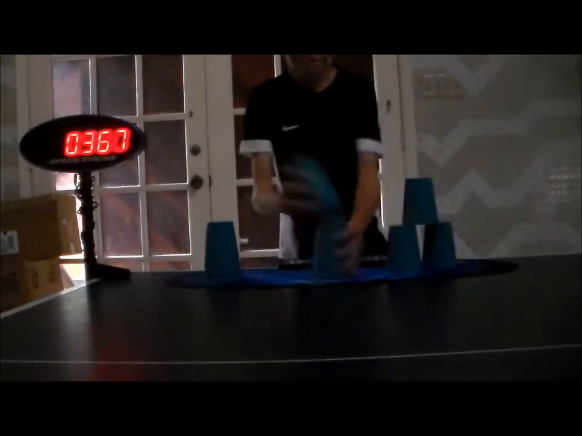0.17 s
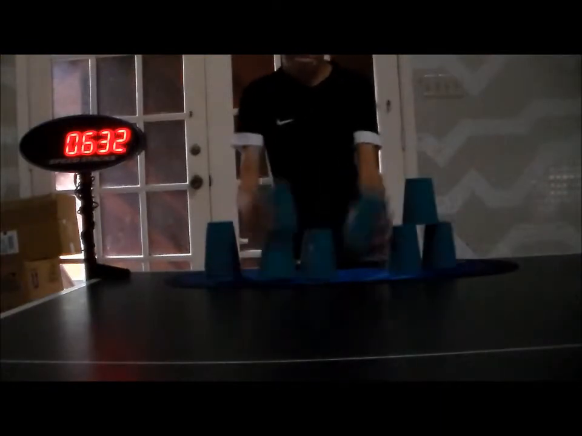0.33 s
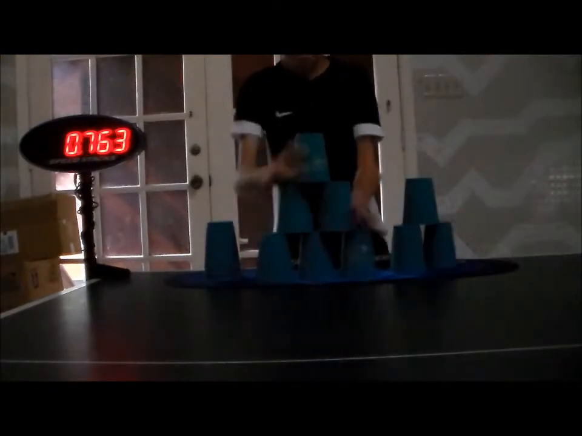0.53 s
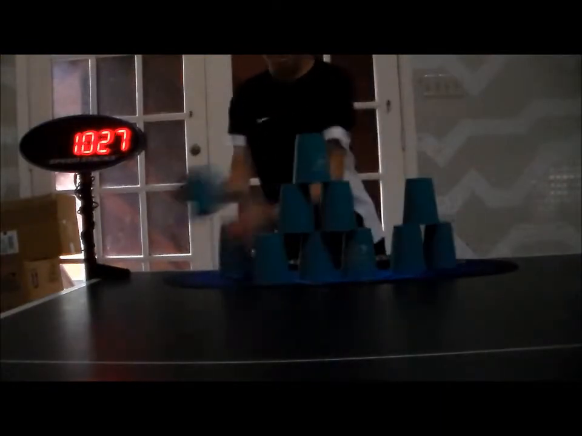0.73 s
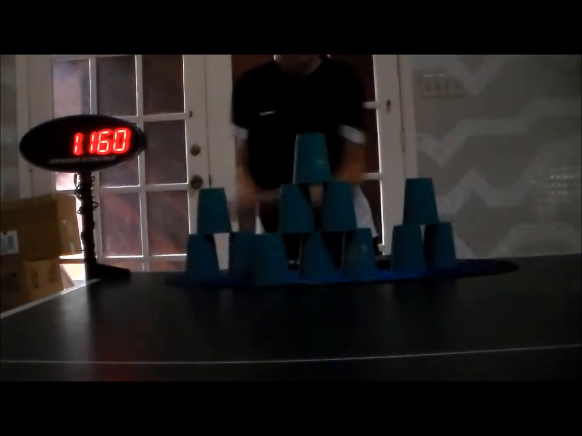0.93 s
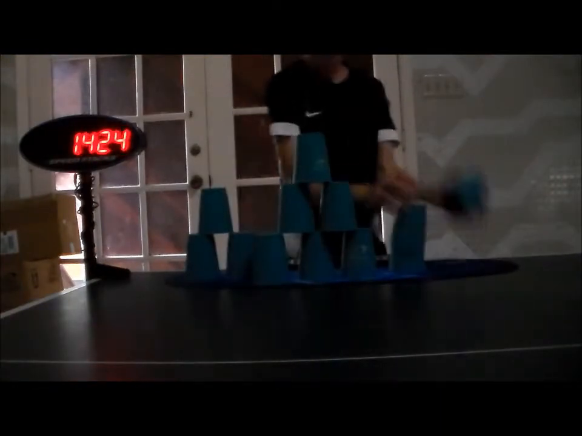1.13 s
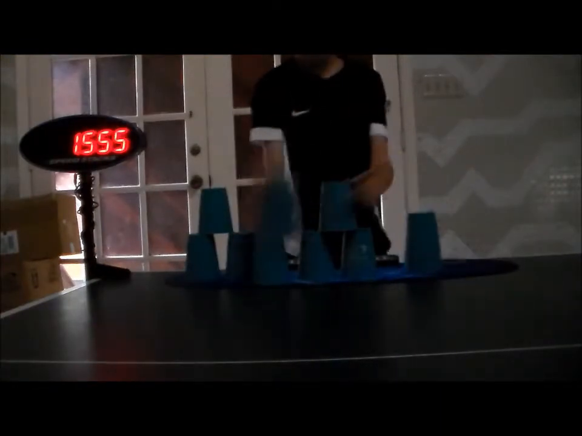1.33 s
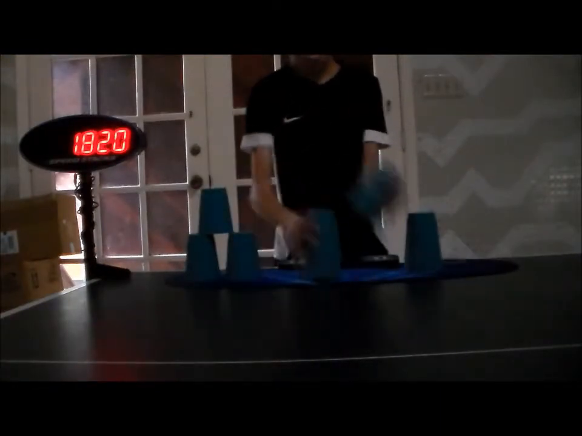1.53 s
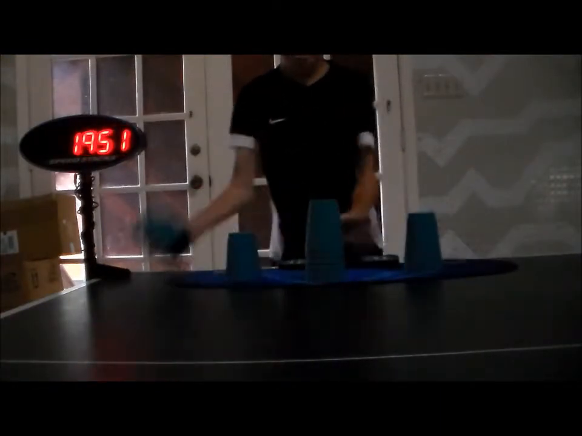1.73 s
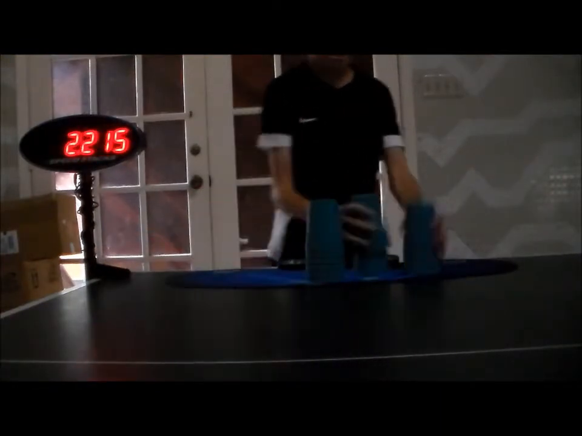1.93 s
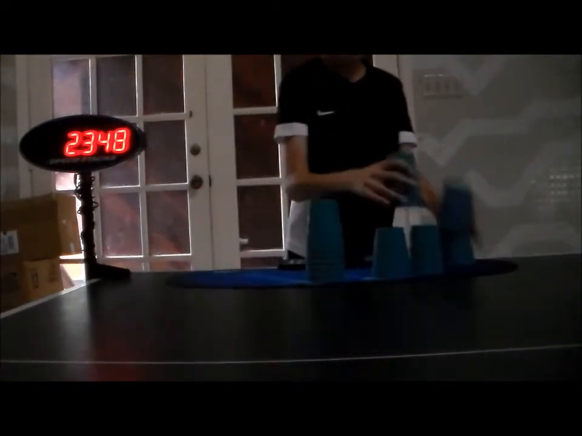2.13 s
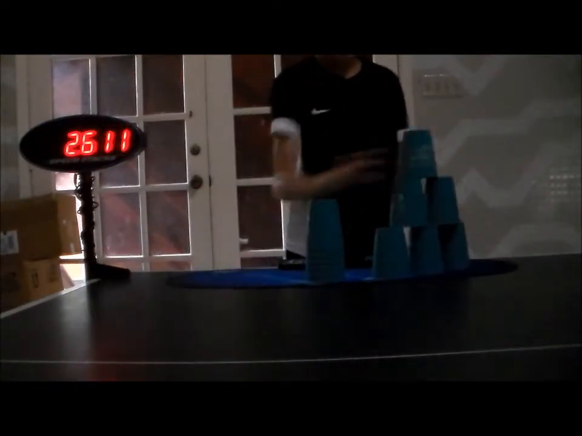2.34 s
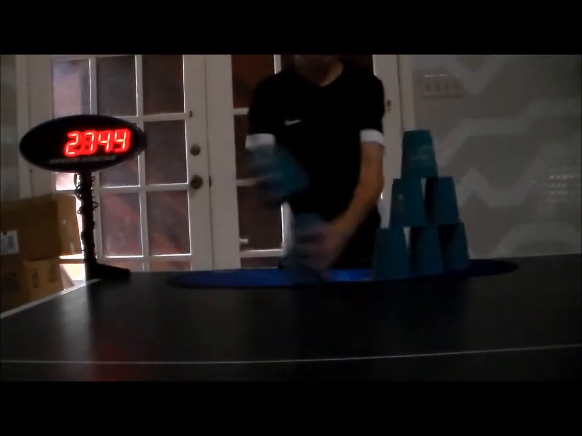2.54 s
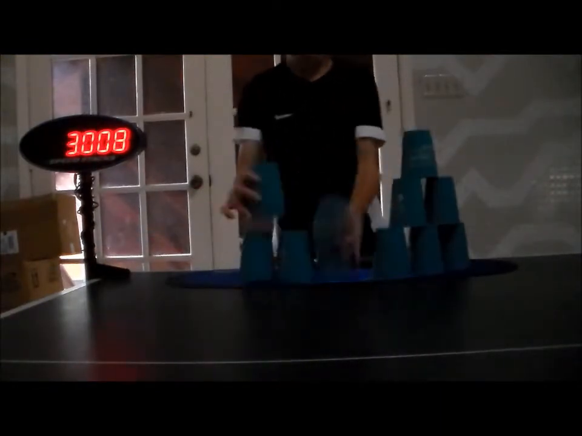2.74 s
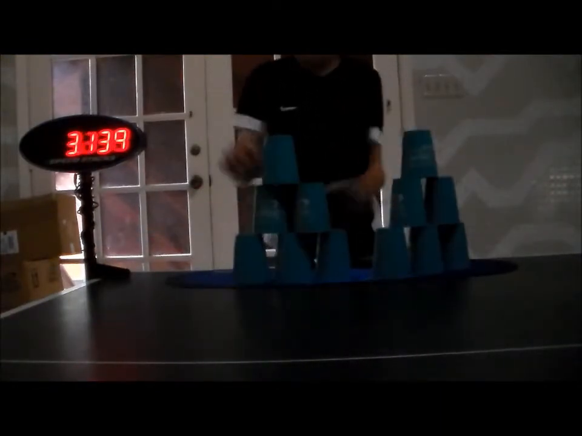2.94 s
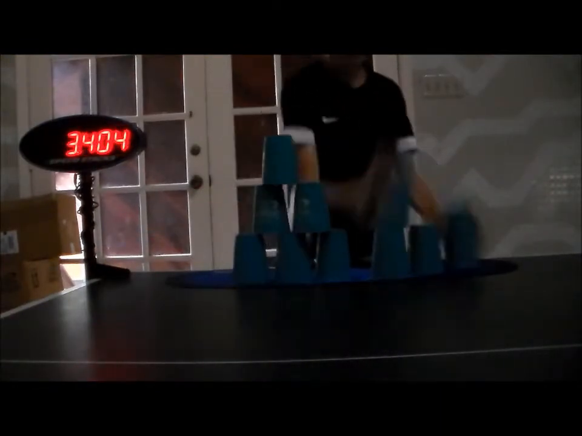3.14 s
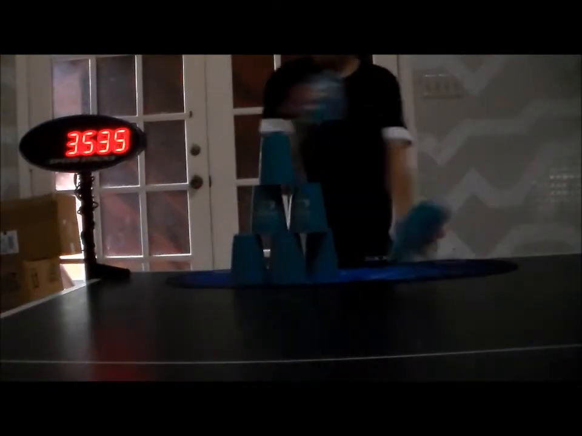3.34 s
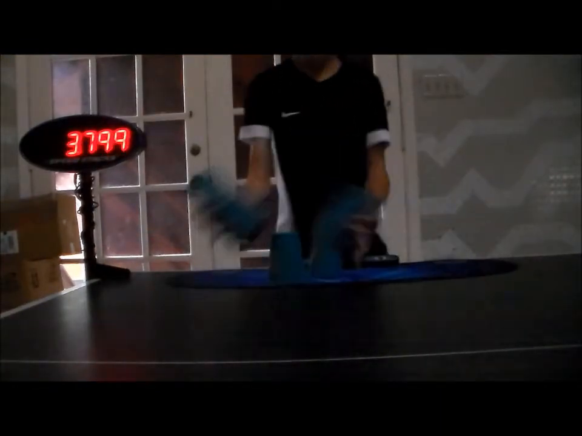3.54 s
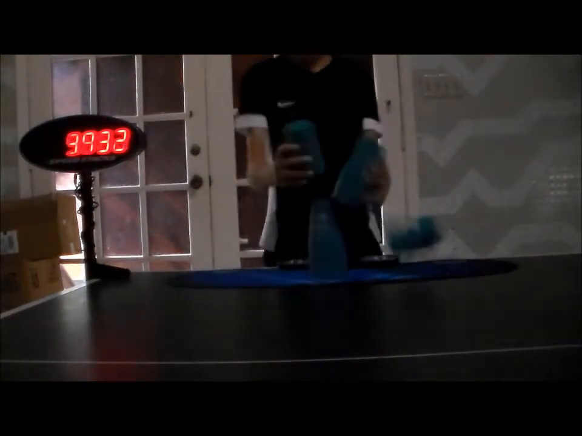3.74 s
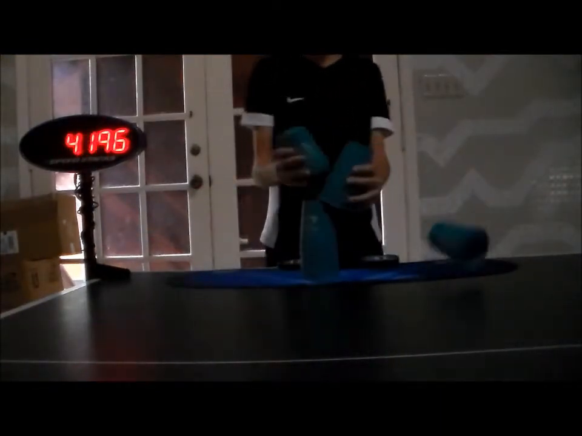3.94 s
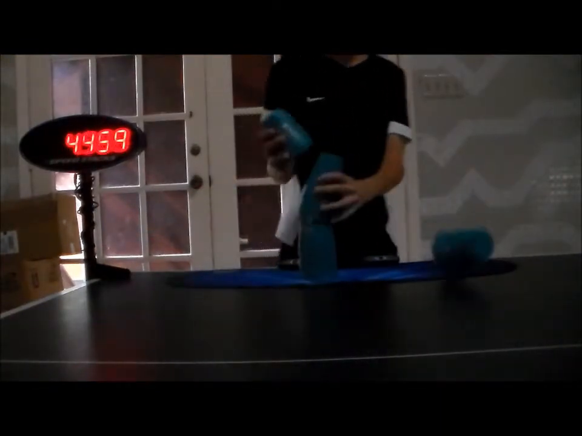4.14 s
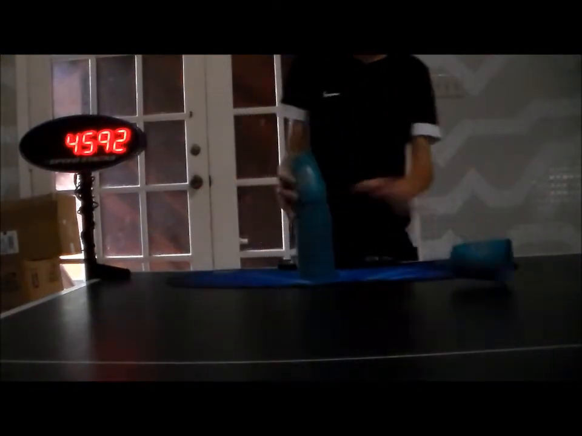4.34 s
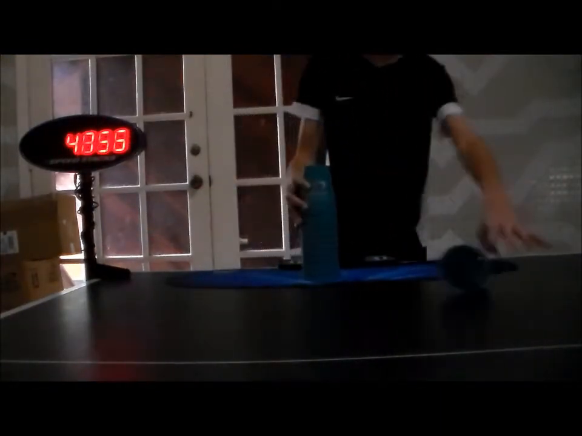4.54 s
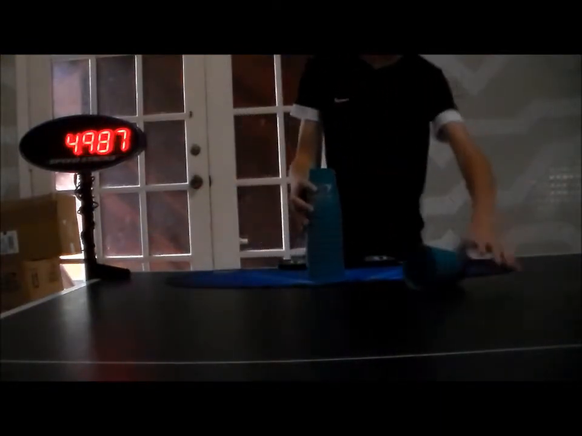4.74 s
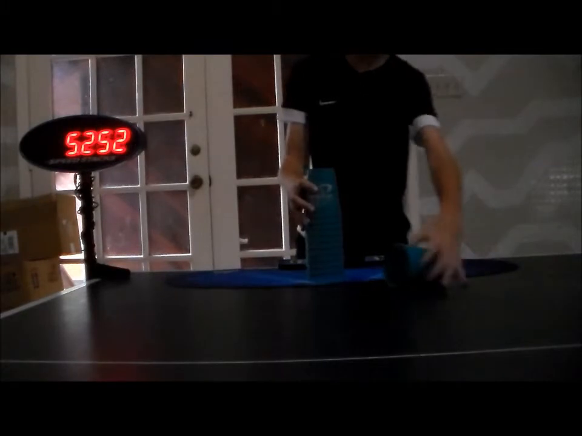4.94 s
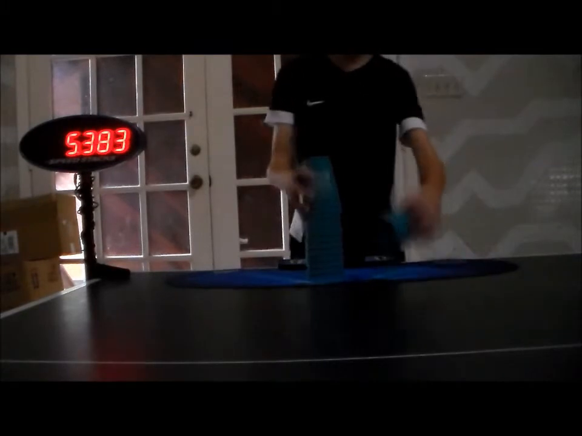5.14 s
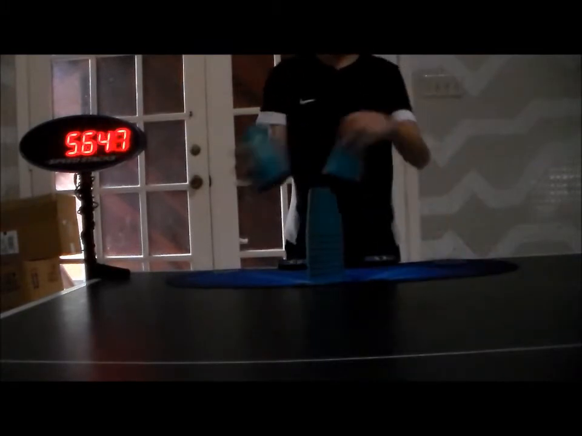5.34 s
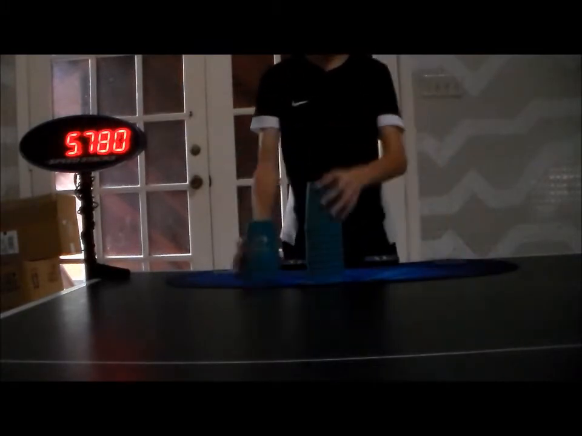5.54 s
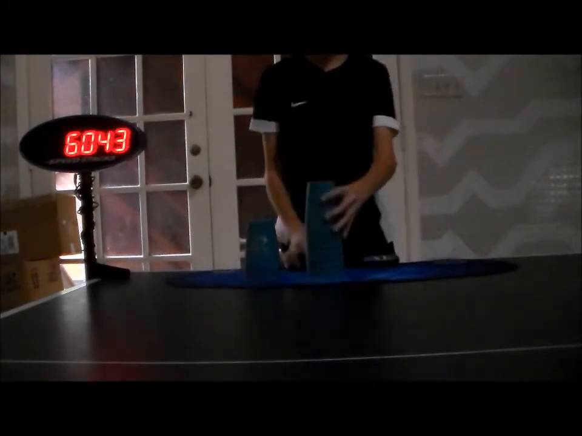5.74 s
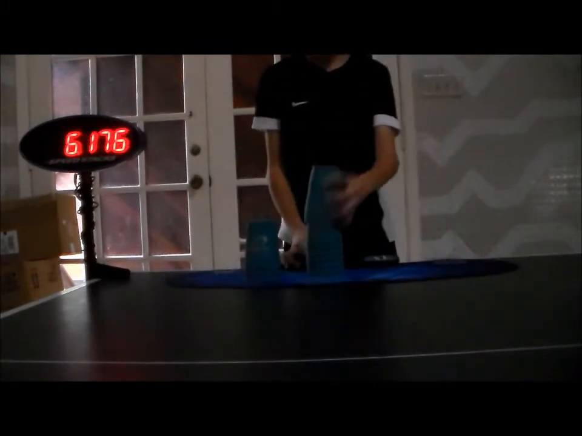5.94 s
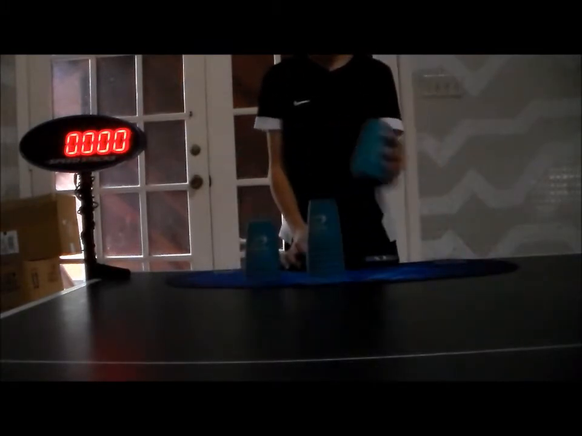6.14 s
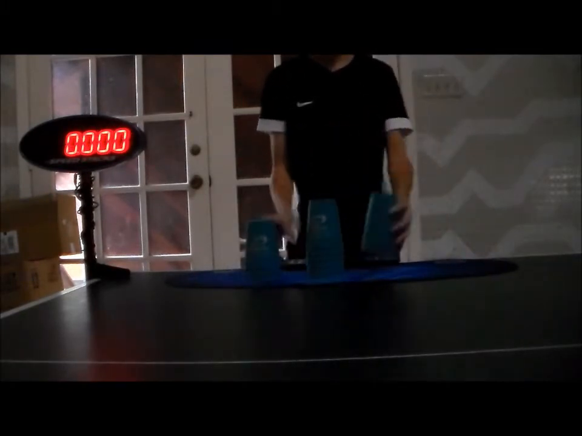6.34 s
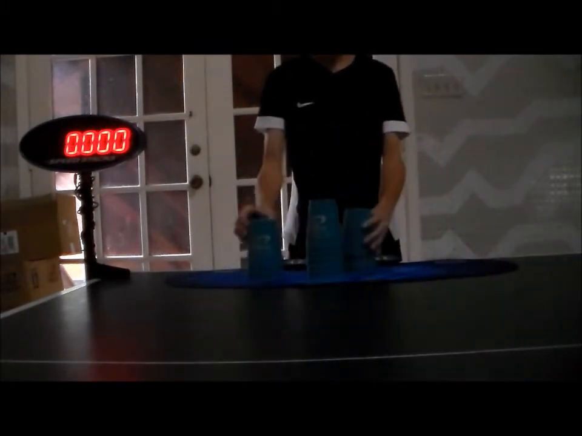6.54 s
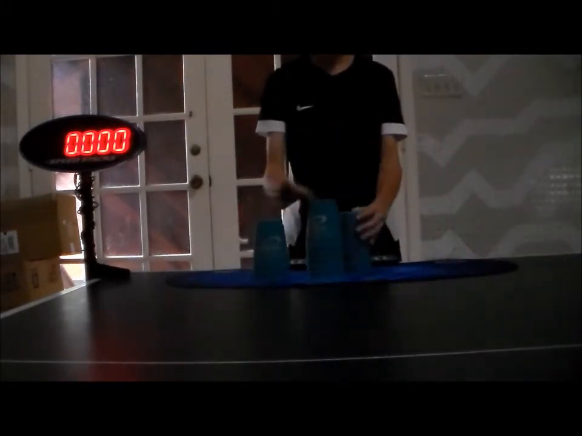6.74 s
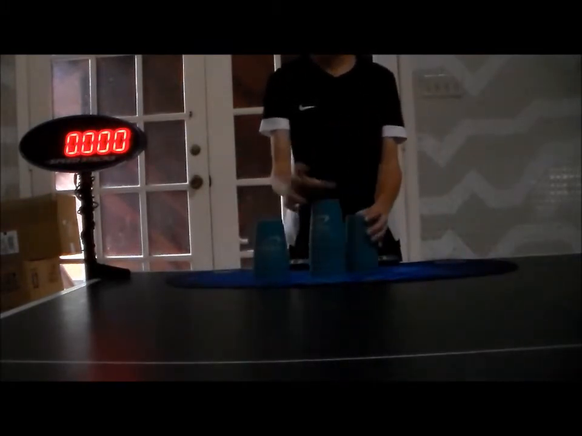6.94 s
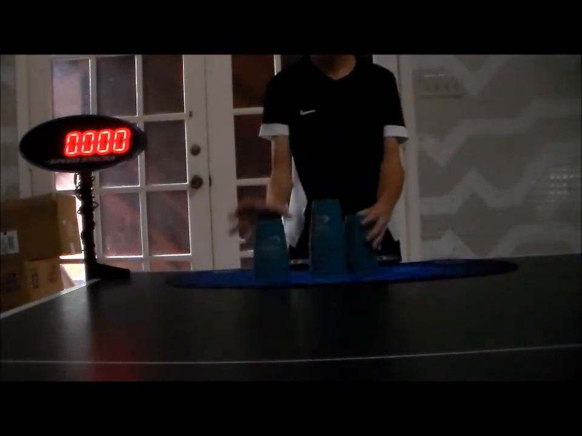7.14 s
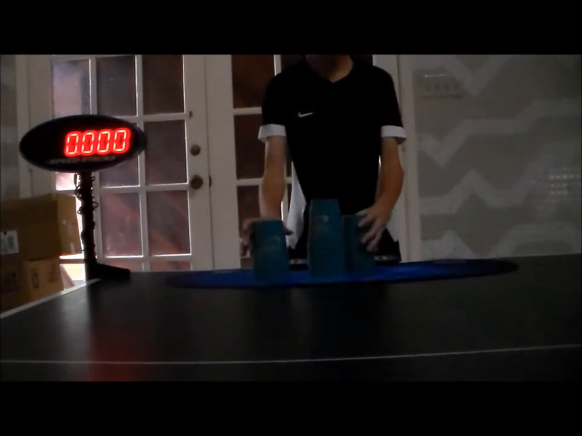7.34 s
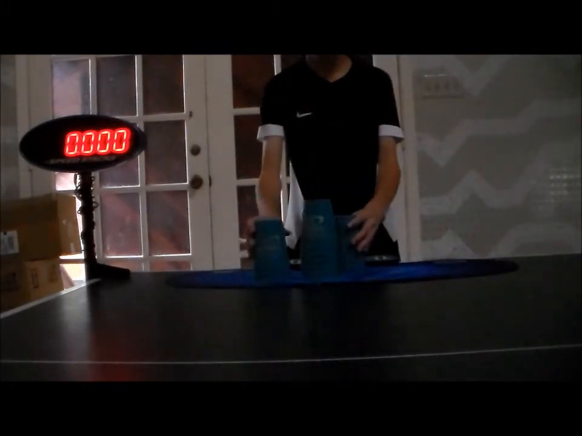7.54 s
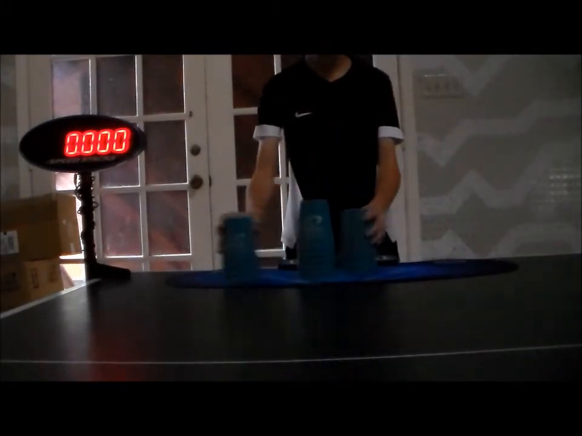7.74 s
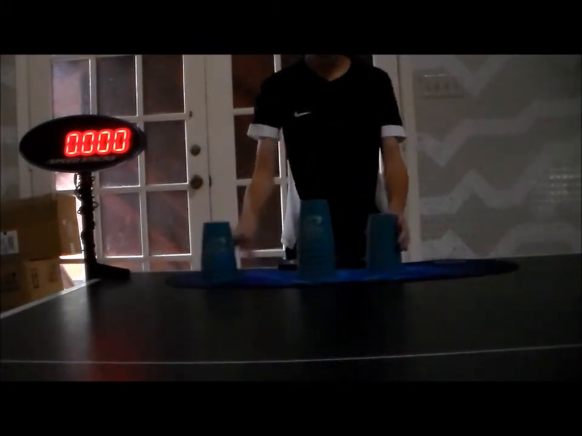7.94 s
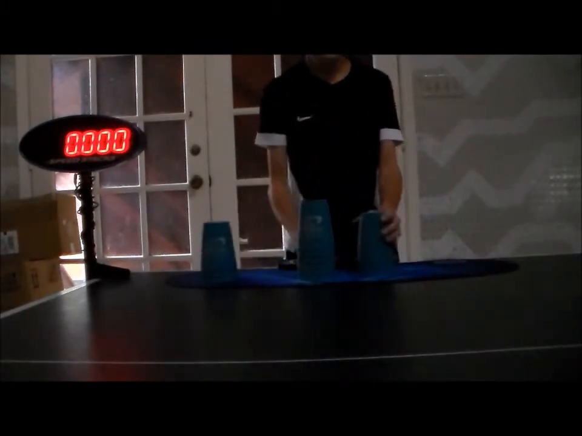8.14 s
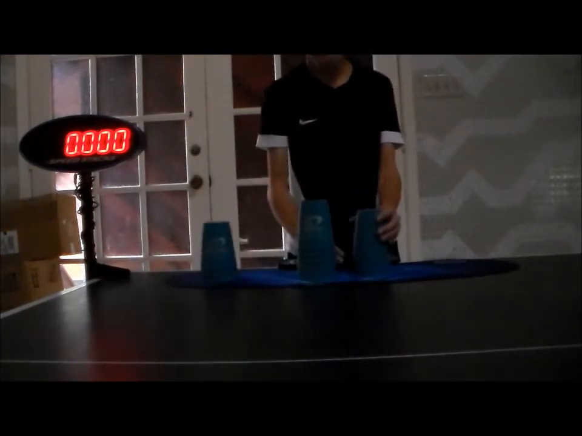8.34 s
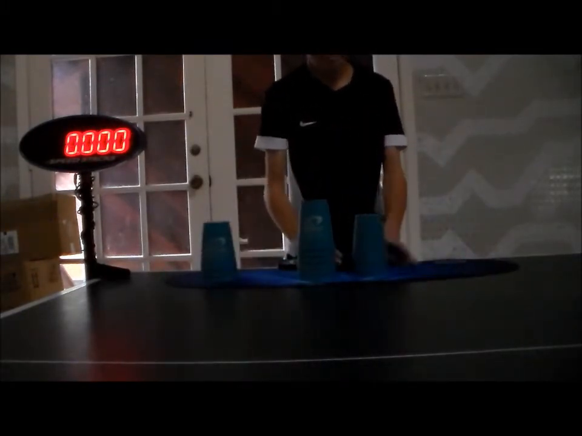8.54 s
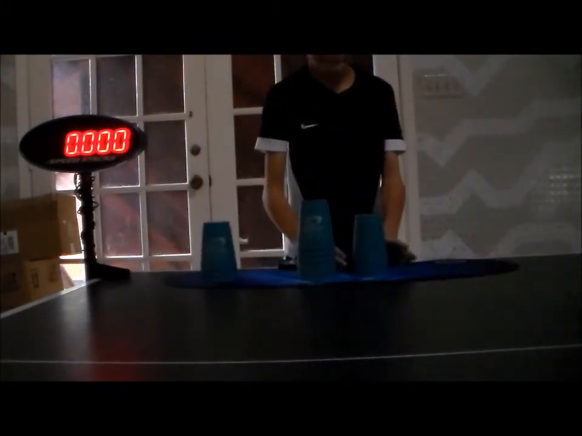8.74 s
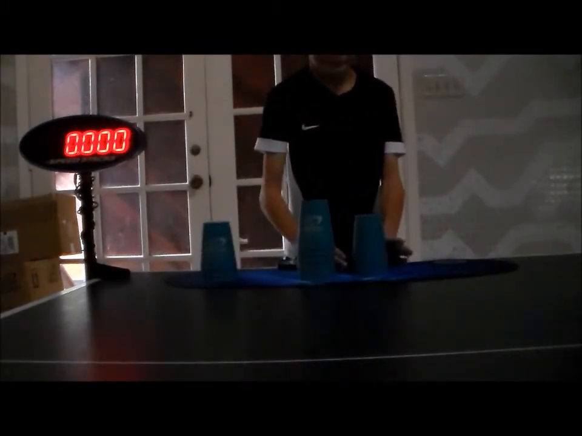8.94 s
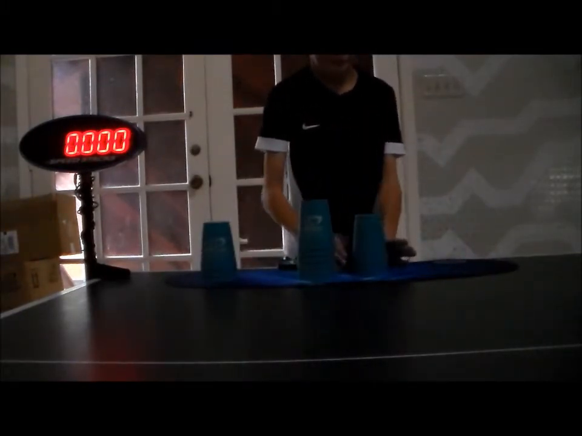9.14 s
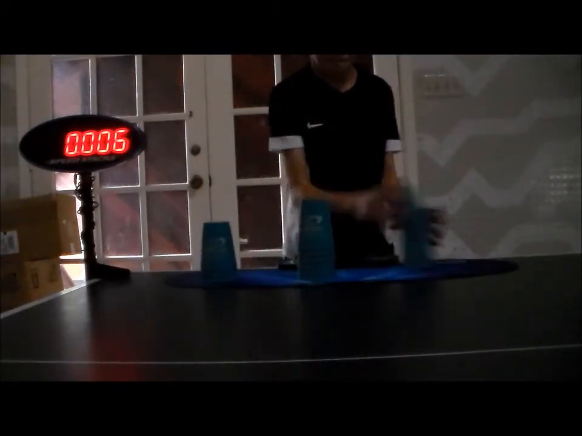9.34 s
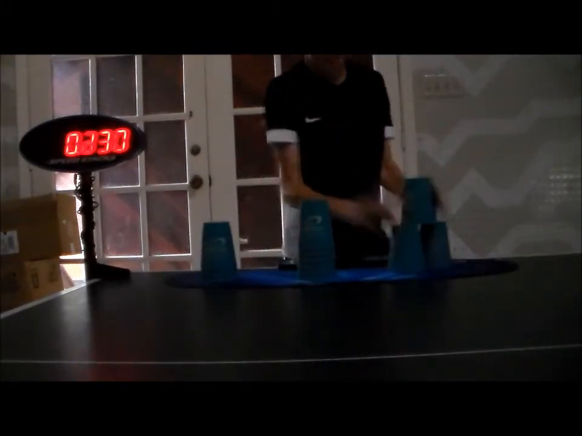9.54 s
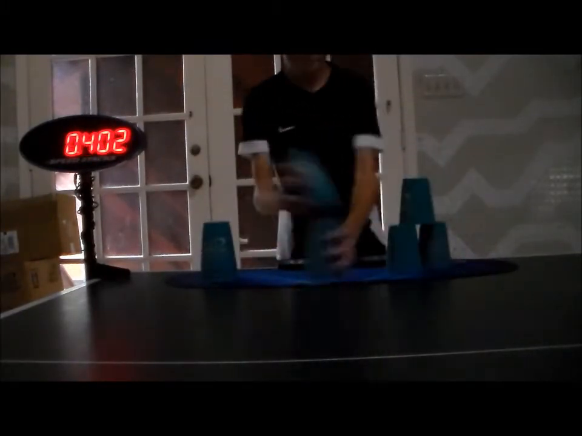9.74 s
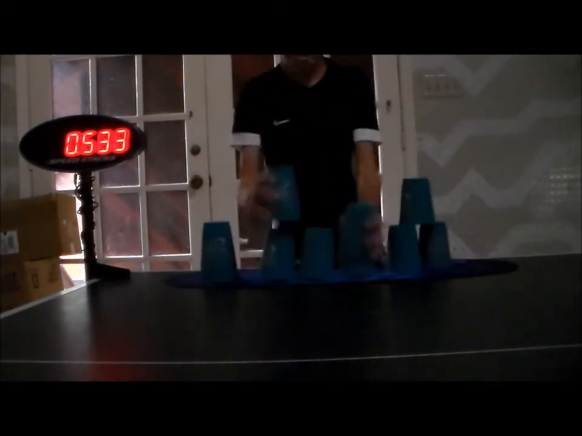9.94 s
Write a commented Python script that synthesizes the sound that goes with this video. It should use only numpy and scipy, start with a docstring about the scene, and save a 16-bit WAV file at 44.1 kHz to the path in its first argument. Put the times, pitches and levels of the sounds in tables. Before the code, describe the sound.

Rapid plastic cup stacking rattles and thumps on a hollow table; one cup drops and rolls, sparse set-downs follow, then stacking resumes.

```python
"""Small plastic cups are stacked and unstacked fast on a thin mat on a large hollow table in a bare room.
The air in a cup pops as a short damped tone when it lands or nests; rims clack as filtered noise bursts.
Decaying modes sound the hollow table top, the walls of a stack set down and a fallen cup that bounces and rolls.
Random grains make cups rattle, slide, scrape and scuff between contacts; noise tails give the echoes.
Mains hum and hiss lie below; at listed times they dip briefly, and the echoes dip slightly with them."""
import sys
import numpy as np
from scipy import signal
from scipy.fft import rfft, irfft, next_fast_len
from scipy.io import wavfile
from scipy.ndimage import uniform_filter1d

SR = 44100
rng = np.random.default_rng(int(sys.argv[2]) if len(sys.argv) > 2 else 0)


def master(y):
    """Save y as 16-bit WAV."""
    cut = np.clip(np.atleast_2d(y).T, -1, 1)
    pcm = np.round(cut * 32767)  # scale
    wavfile.write(sys.argv[1], SR, pcm.astype(np.int16))


N = 440559


def amp(db):
    """Level: converts decibels to an amplitude ratio."""
    return 10 ** (np.asarray(db) / 20)


def rms_one(x):
    """Effective value: scales a signal to rms 1."""
    return x / np.sqrt(np.mean(x ** 2) + 1e-20)


def peak_one(x):
    """Peak value: scales a signal to peak 1."""
    return x / np.abs(x).max()


def bandpass(order, low_hz, high_hz):
    """Band limitation: a Butterworth band-pass between two edges."""
    return signal.butter(order, [low_hz, high_hz], "band", fs=SR, output="sos")


def at_hz(points, hz, axis=1):
    """Spectral interpolation: reads one column of a table along log frequency."""
    points = np.array(points)
    return np.interp(np.log(hz + 1), np.log(points[:, 0] + 1), points[:, axis])


def coloured(x, points):
    """Spectral weighting: multiplies the spectrum by a gain curve in dB."""
    size = next_fast_len(N)
    hz = np.arange(size // 2 + 1) * SR / size
    return irfft(rfft(x, size) * amp(at_hz(points, hz)), size)[..., :N]


def ring(clicks, hz, t60):
    """Damped resonance: a unit click sets an exponentially decaying sine of height 1 ringing."""
    radius = amp(-60 / (t60 * SR))
    w = 2 * np.pi * hz / SR
    # the tiny offset keeps the filter clear of denormal numbers
    return signal.lfilter([0, np.sin(w)], [1, -2 * radius * np.cos(w), radius ** 2], clicks + 1e-18)


def struck(modes, blows, scatter_db=3.0):
    """Modal excitation: every blow strikes each mode with a random strength of its own."""
    times, level_db = np.transpose(blows)
    at = np.clip(np.round(times * SR).astype(int), 0, N - 1)
    luck = rng.standard_normal((len(at), len(modes)))
    out = 0
    for k, (hz, mode_db, t60) in enumerate(modes):
        clicks = np.zeros(N)
        sign = (-1) ** k   # neighbouring modes start in opposite phase
        np.add.at(clicks, at, sign * amp(level_db + mode_db + scatter_db * luck[:, k]))
        out = out + ring(clicks, hz, t60)
    return out


def grains(per_s, spread_db):
    """Granular excitation: random small clicks of uneven size and either sign."""
    sizes = amp(spread_db * np.minimum(rng.exponential(1, N), 4))
    signs = rng.choice([-1, 1], N)
    return sizes * signs * (rng.random(N) < per_s / SR)


def clumps(per_s, depth_db):
    """Slow amplitude modulation: a gain that wanders between random levels."""
    steps = np.arange(0, N + SR, SR / per_s)
    levels = rng.standard_normal(2000)[:len(steps)]
    return amp(depth_db * np.interp(np.arange(N), steps, levels))


def two_stage_decay(t, t60):
    """Two-stage decay: an envelope for a sharp contact, then a weaker, longer noise tail."""
    tail_db, tail_t60_s = -29, 0.039
    return amp(-60 * t / t60) + amp(tail_db - 60 * t / tail_t60_s)


# brief dips of hum and hiss: (start [s], depth [dB], time spent low [s])
DIP_TIMES = [(.07, 21, 0.081), (.62, 15, 0.054), (.95, 8, 0.062), (1.47, 10, 0.15), (1.79, 4, 0.11),
             (2.2, 2.5, 0.68), (2.95, 12, 0.034), (3.27, 5, 0.25), (3.65, 3, 0.064), (3.82, 2.5, 0.043),
             (5.56, 16.5, 0.37), (6.1, 3, 0.12), (6.53, 9, 0.27), (6.8, 2.5, 0.21), (7.92, 3, 0.41),
             (9.63, 19, 0.026)]


def dips():
    """Gain envelope in dB: each dip sinks, stays low and recovers; the deepest one counts."""
    sink_s, recover_s = 0.088, 0.14
    t = np.arange(N) / SR
    depths = []
    for s, depth_db, low_s in DIP_TIMES:
        corners = np.cumsum([s, sink_s, low_s, recover_s])
        depths.append(depth_db * np.interp(t, corners, [0, 1, 1, 0]))
    return -np.max(depths, axis=0)


# spectrum of the hiss: (frequency [Hz], relative level [dB per Hz])
HISS_SPECTRUM = [(12, -16), (20, -4.5), (64, -12.5), (84, -11), (108, -11), (205, -16.5), (249, -18),
                 (328, -21.5), (587, -27.5), (753, -29), (1210, -32.5), (13400, -42), (15000, -52.5)]
# lines of the hum: (frequency [Hz], relative level [dB])
HUM_LINES = [(30, -7.5), (60, -2.5)]


def background():
    """Tonal and broadband noise: wavering mains hum, hiss wide in the treble, a faint hiss that never sinks."""
    hum_db, hiss_against_hum_db, steady_hiss_db = -50.5, -3.5, -67.5
    t = np.arange(N) / SR
    hum = 0
    for hz, line_db in HUM_LINES:
        hum = hum + amp(line_db) * np.sin(2 * np.pi * hz * t + rng.uniform(0, 2 * np.pi))
    hum = np.sqrt(2) * hum * clumps(per_s=8, depth_db=1.5)
    mid, side = rng.standard_normal((2, N))
    # side against mid: (frequency [Hz], level [dB])
    side = coloured(side, [(20, -16.5), (1000, -2.0), (5000, -1.5), (14000, 0.0)])
    hiss = rms_one(coloured(mid + side * [[1], [-1]], HISS_SPECTRUM))
    sinking = amp(hum_db + dips()) * (hum + amp(hiss_against_hum_db) * hiss)
    return sinking + amp(steady_hiss_db) * rng.standard_normal((2, N))


# decay of the room: (frequency [Hz], t60 [s], level [dB])
ROOM_DECAY = [(95, 0.19, -4.5), (250, 0.53, -0.5), (700, 0.32, -4), (1800, 0.49, -3.5), (4800, 0.4, -6.5),
              (11940, 0.34, -3)]
# width of the echoes: (frequency [Hz], side against mid [dB])
ECHO_WIDTH = [(60, -7.5), (180, -24), (540, -17), (1630, -10.5), (4890, 0), (14700, 4)]


def echoes():
    """Reverberation: a noise tail decays band by band, narrow in the low mids and widest in the treble."""
    first_echo_s = 0.0021   # the tail grows in over this time
    t = np.arange(SR // 2) / SR
    white = rng.standard_normal((2, 2, len(t)))
    tail = 0
    edges = 60 * 2 ** np.arange(0, 8.1, .5)   # half octaves [Hz]
    for k, (low, high) in enumerate(zip(edges, edges[1:])):
        hz = np.sqrt(low * high)
        t60 = at_hz(ROOM_DECAY, hz)
        mid, side = signal.sosfilt(bandpass(2, low, high), white[k % 2])
        energy = t60 * SR / (6 * np.log(10))   # dividing by it makes the level independent of t60
        fade = amp(at_hz(ROOM_DECAY, hz, axis=2) - 60 * t / t60) / np.sqrt(energy)
        wide = amp(at_hz(ECHO_WIDTH, hz)) * side * [[1], [-1]]
        tail = tail + fade * (mid + wide)
    return tail * np.clip(t / first_echo_s, 0, 1) ** 2


def room(x, count=6):
    """Convolution: the sound switches at random between several noise tails, which keeps the echoes varied."""
    echo_dip_share = 0.13   # the echoes follow this share of each dip in dB
    choice = np.repeat(rng.integers(0, count, N // 2048 + 1), 2048)[:N]
    wet = 0
    for k in range(count):
        chosen = uniform_filter1d(1. * (choice == k), 256)
        share = np.sqrt(np.abs(chosen))   # crossfade at equal power
        wet = wet + signal.fftconvolve(x[None] * share, echoes(), axes=1)[:, :N]
    return x + amp(echo_dip_share * dips()) * wet


# moves of the hands: (start [s], length [s], rattle of nested cups [dB], slide on the mat [dB],
# cup scraping on cup [dB])
HAND_MOVES = [(0.0, 0.0091, -46, -71, -48), (0.08, 0.23, -47, -79, -65.5), (0.388, 0.092, -32, -50, -47),
              (0.504, 0.04, -45, -65, -52), (0.64, 0.15, -34.5, -47.5, -52.5),
              (0.767, 0.054, -50, -47.5, -46), (0.945, 0.22, -37, -51, -59), (1.19, 0.11, -37, -63, -44),
              (1.352, 0.019, -26.5, -34.5, -41), (1.516, 0.21, -36.5, -41, -52),
              (1.77, 0.18, -36, -41.5, -44), (1.883, 0.14, -33, -41.5, -69),
              (2.233, 0.32, -36.5, -50, -53.5), (2.56, 0.24, -43.5, -52, -52.5),
              (2.732, 0.16, -33.5, -51, -46.5), (2.976, 0.27, -39.5, -48.5, -58),
              (3.203, 0.088, -36.5, -35.5, -46), (3.353, 0.25, -32, -42, -48.5),
              (3.643, 0.12, -33, -38.5, -46), (3.844, 0.21, -41.5, -46.5, -58),
              (4.125, 0.33, -43, -47.5, -48), (4.475, 0.25, -40.5, -67, -51),
              (5.013, 0.085, -56, -60.5, -53), (5.209, 0.043, -56, -62, -44.5), (5.33, 0.13, -65, -68, -62),
              (5.575, 0.049, -47, -48, -81), (6.039, 0.074, -74, -69.5, -57.5),
              (6.226, 0.053, -69, -56.5, -61), (6.56, 0.2, -52, -58, -65.5), (6.786, 0.26, -57, -67, -87),
              (7.048, 0.069, -50, -66, -82), (7.503, 0.5, -68, -66.5, -65), (7.944, 0.063, -61, -66, -59),
              (8.297, 0.19, -57.5, -72, -66), (8.438, 0.015, -64, -57, -59),
              (8.467, 0.041, -41, -62, -53.5), (8.704, 0.69, -88, -92.5, -77.5), (9.4, 0.15, -52, -76, -57),
              (9.535, 0.028, -69, -73, -53), (9.665, 0.073, -44, -68, -75), (9.815, 0.25, -40, -46, -57)]


def moves():
    """Energy envelopes: each move swells, lasts and fades; gains of rattle, slide and scrape."""
    rise_s, fade_t60_s = 0.0096, 0.43
    t = np.arange(0, N, 64) / SR
    power = 0
    for s, length, *levels_db in HAND_MOVES:
        rise = np.clip((t - s) / rise_s, 0, 1)
        fade = amp(-60 * np.maximum(t - s - length, 0) / fade_t60_s)
        power = power + (amp(levels_db)[:, None] * rise * fade) ** 2
    return [np.interp(np.arange(N) / SR, t, np.sqrt(p)) for p in power]


# brief scuffs of cup against cup: (start [s], length [s], level before the swell [dB], centre [Hz])
SCUFF_TIMES = [(0.855, 0.019, -40, 4800), (1.174, 0.02, -43, 4520), (1.214, 0.01, -51, 3000),
               (1.323, 0.041, -43, 1980), (1.795, 0.069, -37, 1830), (3.503, 0.051, -35.5, 3140),
               (3.53, 0.022, -42, 4500), (3.744, 0.02, -38, 2160), (4.036, 0.099, -51, 3560),
               (5.044, 0.037, -50.5, 5550), (5.217, 0.026, -38, 7700), (5.26, 0.033, -42, 5450),
               (5.35, 0.028, -51.5, 4930), (5.406, 0.027, -56, 4000), (6.07, 0.077, -61.5, 1260),
               (6.235, 0.084, -53.5, 1300), (7.062, 0.073, -51.5, 1690), (9.646, 0.071, -49, 5100)]


def scuffs():
    """Friction noise: dense grains swell and fade in a narrow band of their own."""
    spread = 1.09   # band edges as a ratio to the centre
    out, rough = np.zeros(N + SR), grains(per_s=7900, spread_db=2.0)
    for s, length, level_db, hz in SCUFF_TIMES:
        at, size = round(s * SR), round(length * SR)
        scuff = signal.sosfilt(bandpass(1, hz / spread, hz * spread), rough[at:at + size])
        swell = np.sin(np.pi * np.arange(size) / size)
        out[at:at + size] += amp(level_db) * rms_one(scuff) * swell
    return out[:N]


# air in stacked cups: (frequency [Hz], level [dB], t60 [s])
NESTED_AIR = [(520, 8.5, 0.0082), (640, -6.5, 0.02), (780, -9.5, 0.07), (900, -2, 0.04), (1000, 1, 0.022),
              (1130, -2, 0.043)]
# rim sliding on the mat: (frequency [Hz], relative level [dB per Hz])
SLIDE_SPECTRUM = [(900, -33.5), (1400, 6.5), (2250, 9.5), (2800, -4.5), (4000, -1.5), (9000, -26)]
# rim scraping on rim: (frequency [Hz], relative level [dB per Hz])
SCRAPE_SPECTRUM = [(900, -23.5), (2000, -1.5), (3500, 2), (7000, 0.5), (9000, -9), (14000, -12.5)]


def handling():
    """Grain-driven resonance and friction: loose cups rattle into trapped air; rims rub on mat and rims."""
    rattling, sliding, scraping = moves()
    knocks = [ring(grains(per_s=150, spread_db=4.0), hz, t60) for hz, _, t60 in NESTED_AIR]
    rattle = sum(amp(mode_db) * knock for (_, mode_db, _), knock in zip(NESTED_AIR, knocks))
    # rubbing comes in fits
    slide = coloured(grains(per_s=1100, spread_db=3.5), SLIDE_SPECTRUM) * clumps(per_s=28, depth_db=3.0)
    scrape = coloured(grains(per_s=4300, spread_db=3.5), SCRAPE_SPECTRUM) * clumps(per_s=61, depth_db=3.5)
    return rattling * rms_one(rattle) + sliding * rms_one(slide) + scraping * rms_one(scrape)


# modes of a fallen cup: (frequency [Hz], level [dB], t60 [s])
FALLEN_CUP_MODES = [(1150, -0.5, 0.056), (2100, -11, 0.05), (2426, -5, 0.06), (3360, -7.5, 0.04),
                    (4500, -12, .03)]
# its bounces: (time [s], level [dB])
BOUNCE_TIMES = [(4.014, -34), (4.146, -30), (4.311, -36), (4.483, -38), (4.692, -37), (4.708, -48)]


def fallen_cup_bounces():
    """Modal ringing: each bounce sets the modes of a fallen cup ringing."""
    return struck(FALLEN_CUP_MODES, BOUNCE_TIMES)


def fallen_cup_roll():
    """Sustained modal excitation: the rolling rim chatters on the table and keeps the cup's modes ringing."""
    from_s, to_s, edge_s = 4.01, 4.77, 0.0096
    level_db, t60_s = -48.5, 0.027   # one decay time for all modes
    chatter = grains(per_s=400, spread_db=4.5)
    rings = sum(amp(mode_db) * ring(chatter, hz, t60_s) for hz, mode_db, _ in FALLEN_CUP_MODES)
    corners = [from_s, from_s + edge_s, to_s, to_s + edge_s]
    rolling = np.interp(np.arange(N) / SR, corners, [0, 1, 1, 0])
    return amp(level_db) * rolling * rms_one(rings)


# walls of the stack: (frequency [Hz], level [dB], t60 [s])
STACK_MODES = [(812, -7.5, 0.03), (987, 0, 0.031), (1070, -4.5, 0.027), (1220, -9, 0.023),
               (1374, -8, 0.052), (1503, -1.5, 0.021), (1900, -2.5, 0.015), (2293, -16, 0.017),
               (2750, -16.5, 0.013), (3380, -19.5, 0.017)]
# a stack is set down on the mat: (time [s], level [dB])
SET_DOWN_TIMES = [(5.588, -26.5), (5.597, -27), (6.531, -22.5), (6.719, -32), (7.038, -27.5), (7.794, -35),
                  (7.922, -19), (8.284, -23.5), (8.474, -23.5), (9.371, -23)]


def stack_set_downs():
    """Modal ringing: the nested walls answer as a stack is set down."""
    return struck(STACK_MODES, SET_DOWN_TIMES)


# modes of the hollow table top: (frequency [Hz], level [dB], t60 [s])
TABLE_MODES = [(166.9, -18.5, 0.22), (206.4, -4.5, 0.026), (230, -1.5, 0.053), (294, -5, 0.043),
               (334.4, -9.5, 0.073), (383.5, -4.5, 0.023)]
# its thumps: (time [s], level [dB])
THUMP_TIMES = [(0.009, -21), (0.055, -35), (0.4, -17), (0.48, -14), (0.674, -35), (0.815, -20.5),
               (0.912, -23), (1.159, -20), (1.238, -41), (1.307, -18), (1.363, -23), (1.465, -23),
               (1.505, -33), (1.547, -28), (1.624, -19.5), (1.764, -21), (1.917, -26), (1.964, -23.5),
               (2.113, -27), (2.21, -20), (2.327, -31), (2.518, -22.5), (2.588, -26.5), (2.823, -15),
               (2.899, -22), (3.154, -32), (3.204, -19), (3.277, -15.5), (3.361, -23), (3.457, -18.5),
               (3.551, -11.5), (3.721, -17), (3.811, -17), (4.012, -22.5), (4.145, -22.5), (4.259, -26),
               (4.384, -19.5), (4.486, -23.0), (4.567, -21), (4.629, -20.5), (5.039, -33.5), (5.121, -37),
               (5.587, -30.5), (5.603, -33), (6.529, -21.5), (6.718, -35), (6.758, -29), (6.976, -34.5),
               (7.045, -31), (7.795, -35.5), (7.926, -21.5), (8.284, -33), (8.446, -36), (8.476, -18),
               (9.379, -19), (9.577, -28), (9.613, -22), (9.963, -14)]


def table_thumps():
    """Plate resonance: the table top answers blows with its low, dull modes."""
    return struck(TABLE_MODES, THUMP_TIMES)


# clacks of the rims: (time [s], peak level [dB], wall resonance [Hz], bright edge against wall [dB])
CLACK_TIMES = [(0.067, -9.5, 2120, -35), (0.271, -29, 1890, -19), (0.376, -27.5, 3700, -15),
               (0.406, -20.5, 4800, -20), (0.477, -24, 3180, -8), (0.488, -16.5, 3920, -23),
               (0.511, -26, 2430, -9.5), (0.571, -27, 2300.0, -16.5), (0.585, -21.5, 2410, -23),
               (0.607, -19.5, 1900, -24), (0.618, -22, 4250, -22), (0.623, -18, 2200.0, -28),
               (0.664, -24, 2110, -21), (0.792, -27, 5460, -8), (0.9, -21, 3470, -12),
               (0.9147, -23.5, 2420, -14), (0.946, -14.5, 1620, -23), (1.238, -19, 2470, -15),
               (1.266, -13.5, 2260, -13), (1.292, -11.5, 2630, -8), (1.312, -16.5, 3200, -11),
               (1.315, -14.5, 1850, -18), (1.392, -10.5, 5140, -4), (1.414, -15, 2500, -9),
               (1.436, -13.5, 2300, -19), (1.443, -27, 3000, -4), (1.469, -7, 1530, -19.5),
               (1.547, -15, 1630, -29.5), (1.623, -13.5, 1840, -30), (1.669, -24, 2100.0, -14),
               (1.679, -32, 5500, -1.5), (1.684, -14.5, 1900, -23), (1.751, -19, 2600.0, -2),
               (1.7698, -15.5, 1900, -13.5), (1.79, -9, 1650, -11), (1.886, -15.5, 3800, -11),
               (1.965, -31, 2070, -12), (2.13, -23, 1800, -27.5), (2.171, -19, 1800.0, -22),
               (2.193, -25.5, 1800.0, -16), (2.219, -23, 4770, -18), (2.303, -18, 1580, -31),
               (2.33, -22.5, 2280, -26), (2.366, -21.5, 2300, -23), (2.373, -23, 2300, -16),
               (2.59, -27.5, 4100.0, -9), (2.598, -22, 1900, -18), (2.722, -21, 3680, -8),
               (2.748, -20.5, 5070, -12), (2.8, -15, 1820, -28.5), (2.825, -16, 2830, -18),
               (2.908, -22.5, 2750, -1), (2.9486, -19, 3470, -24), (2.969, -17, 4300, -21),
               (3.157, -21, 1710, -17), (3.201, -17.5, 2240, -21), (3.216, -18, 5100.0, -14),
               (3.236, -17, 1600.0, 6), (3.249, -9, 1640, -23), (3.27, -18, 2000, -12),
               (3.454, -13, 4500, -14), (3.48, -18, 4800.0, -5), (3.51, -17.5, 2700, -16),
               (3.526, -18, 2560, -17), (3.553, -16, 3770, -11), (3.557, -12.5, 1530, -18.5),
               (3.603, -12, 1730, -23), (3.6071, -15.5, 1870, -14), (3.746, -29, 2250, -10.5),
               (3.8113, -22.5, 5570, -24), (3.8115, -17, 2600, -17), (3.8585, -21, 2000, -20),
               (4.011, -16.5, 2280, -19), (4.034, -27, 2400.0, -19), (4.147, -15, 4020, -16),
               (4.272, -16.5, 4800, -28), (4.299, -18, 5200, -7), (4.308, -32, 2030, -15),
               (4.329, -16.5, 4280, -11), (4.475, -24, 2480, -22), (4.483, -12, 3030, 0),
               (4.569, -17.5, 2330, -5), (4.625, -19, 2270, -8), (4.664, -20.5, 2250, -7),
               (4.69, -22, 2200, -10), (4.709, -27, 3300.0, 3), (5.028, -34, 2400.0, -10),
               (5.191, -18, 4500, -1), (5.485, -17.5, 4730, -26), (5.5005, -11.5, 4330, -8),
               (5.581, -22, 1850, -19), (5.589, -23, 1600.0, -27), (5.6, -25, 3830, -23),
               (6.056, -34, 2740, -9.5), (6.231, -26, 2500, -20), (6.314, -35, 3450, -17),
               (6.479, -37.5, 1740, -22), (6.533, -17.5, 2240, -18), (6.581, -28.5, 2100, -23),
               (6.719, -25.5, 1780, -25), (6.98, -30, 1720, -17), (7.038, -24, 1760, -28),
               (7.922, -16, 1550, -20), (8.285, -24.5, 1800, -20), (8.471, -25, 1900, 4),
               (9.368, -23, 1690, -7), (9.372, -16, 1680, -15), (9.543, -27, 3200, -9),
               (9.627, -11.5, 3940, -23), (9.635, -16, 2110, -16), (9.829, -25, 2000, -39),
               (9.852, -23, 2020, -19), (9.947, -23, 3480, -9), (9.967, -20.5, 2860, -8)]


def clacks():
    """Impact excitation: a click and noise burst drive two wall resonances, a broad snap and a bright edge."""
    t60_s, rise_s = 0.013, 0.00057
    click_db = 14   # first touch against the noise that follows
    wall_spread, reference_hz = 1.123, 2000   # higher wall resonances are broader
    overtone, overtone_db = 1.62, -19.5   # second wall resonance: ratio to the first, level
    snap_db, snap_t60_s = -15, 0.017   # the whole wall under each clack; an added decay
    out, t = np.zeros(N + 3000), np.arange(3000) / SR
    shape = two_stage_decay(t, t60_s) * (1 - np.exp(-t / rise_s))
    bursts = rng.standard_normal((len(CLACK_TIMES), 2, len(t))) * shape
    bursts[..., 0] = amp(click_db)   # a hard first touch keeps the colour even
    broad = bandpass(2, 1370, 5150)
    bright = signal.butter(2, 7000, "high", fs=SR, output="sos")
    for (s, peak_db, hz, edge_db), (burst, edge_burst) in zip(CLACK_TIMES, bursts):
        spread = wall_spread ** (hz / reference_hz)
        band = np.array([hz / spread, hz * spread])
        wall = signal.sosfilt(bandpass(1, *band), burst)
        upper = signal.sosfilt(bandpass(1, *np.minimum(band * overtone, .45 * SR)), burst)
        snap = signal.sosfilt(broad, burst * amp(-60 * t / snap_t60_s))
        edge = signal.sosfilt(bright, edge_burst)
        clack = rms_one(wall) + amp(overtone_db) * rms_one(upper)
        clack = clack + amp(snap_db) * rms_one(snap) + amp(edge_db) * rms_one(edge)
        at = round(s * SR)
        out[at:at + len(t)] += amp(peak_db) * peak_one(clack)
    return out[:N]


# air pops in the cups: (time [s], peak level [dB], pitch [Hz], length [ms], below 1 counts as 1 in the swell)
POP_TIMES = [(0.01, -26.5, 720, 6.6), (0.048, -10, 660, 3), (0.059, -18, 755, 3.5), (0.071, -9, 1064, 7.2),
             (0.27, -37, 1000.0, 2.1), (0.398, -15.5, 570, 2.8), (0.424, -23, 1000, 6.3),
             (0.442, -27, 1170, 5.5), (0.479, -14, 650, 5.6), (0.507, -19, 533, 4.8),
             (0.575, -20, 640, 1.6), (0.586, -10.5, 847, 4), (0.607, -12, 900, 4.4),
             (0.614, -14.5, 940, 5.5), (0.618, -11, 910, 7.6), (0.685, -20, 940, 14.6),
             (0.722, -24.5, 935, 21), (0.806, -21, 598, 9.3), (0.819, -17.5, 575, 9.3),
             (0.861, -23.5, 520, 5.1), (0.9155, -8.5, 650, 0.63), (0.936, -24, 1000, 10),
             (0.947, -7.5, 1125, 4.1), (1.146, -22.5, 908, 12), (1.158, -15.5, 950, 6),
             (1.194, -16, 1070, 9.4), (1.237, -18.5, 640.0, 10), (1.265, -19.5, 660, 6.8),
             (1.292, -16.5, 1025, 6.1), (1.314, -15.5, 426, 2.3), (1.365, -16, 700, 2.5),
             (1.371, -18, 520.0, 3.2), (1.378, -23, 878, 17), (1.391, -12.5, 925, 0.86),
             (1.416, -21, 1040, 2.3), (1.436, -16, 900, 4.4), (1.469, -11.5, 1450, 1.8),
             (1.5, -8.5, 1000.0, 5.4), (1.507, -14, 1116, 6.9), (1.545, -23, 1150, 12),
             (1.684, -15, 1000, 2.3), (1.752, -9.5, 780, 0.88), (1.77, -15, 990, 3.6),
             (1.789, -15, 745, 2.4), (1.888, -12, 1130.0, 0.88), (1.918, -14, 563, 3),
             (1.99, -37, 1020, 2.7), (2.02, -31, 726, 2.4), (2.13, -23, 950, 4.6), (2.17, -17, 1090, 6.1),
             (2.208, -12, 680, 3.7), (2.232, -24, 700.0, 6.2), (2.303, -10.5, 940, 4.3),
             (2.329, -16, 920, 4.6), (2.355, -8.5, 1090, 3.6), (2.366, -14, 927, 11),
             (2.499, -22, 1000.0, 5.5), (2.588, -27.5, 840, 7.3), (2.639, -19, 930, 6.4),
             (2.741, -8, 575, 1.4), (2.802, -21, 910, 7.2), (2.821, -11, 600, 2.4), (2.843, -26, 825, 4.8),
             (2.871, -20.5, 520, 10), (2.908, -13, 500, 4.9), (2.949, -9.5, 910, 4), (2.958, -10, 900, 6.6),
             (2.97, -10.5, 1066, 6.4), (2.997, -20, 960, 4.5), (3.066, -28.5, 985, 76),
             (3.16, -12, 910, 13.7), (3.197, -8.5, 960, 3.8), (3.216, -17, 1060, 12),
             (3.239, -11.5, 830, 0.92), (3.248, -20, 1560, 5), (3.418, -22, 865, 9.8),
             (3.455, -12.5, 1060, 5.3), (3.473, -13, 950, 4.2), (3.51, -26, 554, 20),
             (3.541, -10.5, 554, 1.9), (3.602, -15, 890, 5.1), (3.64, -22, 1020, 7), (3.676, -16, 730, 1.4),
             (3.713, -19, 484, 10), (3.754, -20, 520.0, 3.4), (3.776, -22, 500, 5.8),
             (3.8104, -11, 870, 4.2), (3.967, -18.5, 830, 4), (3.988, -29, 730, 7.5),
             (4.015, -24, 1190, 6.6), (4.134, -25.5, 580, 9.2), (4.147, -21.5, 1125, 9),
             (4.195, -31, 1190, 7.9), (4.273, -16, 930, 4.5), (4.282, -23, 950, 26), (4.3, -21, 997, 12),
             (4.311, -6.5, 900.0, 1.2), (4.333, -25, 1090, 7), (4.483, -20, 740, 2.9),
             (4.569, -24.5, 740, 5.1), (4.625, -20.5, 754, 3.6), (4.664, -19, 640, 0.79),
             (4.688, -23, 680, 4), (4.711, -22, 900, 1.4), (5.027, -44, 610, 3.6), (5.122, -35.5, 533, 6.3),
             (5.192, -28, 640, 0.83), (5.225, -30, 520, 4.7), (5.262, -33, 540.0, 6),
             (5.423, -41.5, 945, 4.7), (5.4845, -22.5, 687, 10.5), (5.4845, -17.5, 1040, 3.8),
             (5.5005, -15, 810, 1.7), (5.5028, -16.5, 700, 1.1), (5.515, -20, 690, 0.88),
             (5.582, -10, 580, 2.1), (6.058, -44, 1310, 3.4), (6.231, -30, 1365, 4.8),
             (6.479, -35, 1085, 5), (6.495, -31, 1150, 4), (6.53, -14, 587, 3.4), (6.594, -33, 1000, 11),
             (6.719, -22.5, 1070, 5.3), (6.722, -30, 1440, 5.3), (6.761, -28, 1050, 3.4),
             (6.926, -34, 437, 0.75), (6.979, -28.5, 1030, 6.7), (7.038, -20, 1150, 2.9),
             (7.04, -22.5, 664, 3.8), (7.469, -42.5, 900, 3), (7.796, -24.5, 1180, 0.83),
             (7.922, -13.5, 1000.0, 3.5), (8.015, -22, 1057, 5.9), (8.044, -33, 1020, 3.3),
             (8.193, -48, 1080, 5), (8.284, -17.5, 1000, 0.96), (8.474, -12.5, 1060, 1.9),
             (9.323, -42.5, 1330.0, 2.1), (9.371, -12.5, 1020, 3.7), (9.461, -31, 588, 11),
             (9.48, -25, 860, 3.6), (9.481, -27, 1720, 6.3), (9.503, -33, 1830, 5), (9.526, -39, 1940, 3.8),
             (9.578, -31, 780.0, 3.9), (9.611, -9, 706, 2.1), (9.619, -24, 700.0, 11),
             (9.629, -11.5, 1077, 7.4), (9.638, -6.5, 1000, 2.2), (9.657, -39, 1060, 8.7),
             (9.853, -23, 1380, 0.7), (9.963, -14.5, 700, 5.8)]


def pops():
    """Cavity resonance: a cup's air rings for a few cycles, pitched by nesting, with a broad dull knock."""
    rise_share = 0.4   # swell time as a share of the length
    stop = 1.03   # how abruptly the ring is smothered (1 = plain decay)
    knock_t60_s, below, above = 0.012, 2.91, 1.466   # knock band edges as ratios to the pitch
    knock_db, knock_loss_db_per_ms = 0.5, 0.65   # long pops come from gentle nesting
    detune, partial_db = 0.326, -10.5   # two weaker, randomly detuned partials roughen the tone
    out, t = np.zeros(N + 4000), np.arange(4000) / SR
    knocks = rng.standard_normal((len(POP_TIMES), len(t))) * two_stage_decay(t, knock_t60_s)
    detuned = 1 + detune * rng.uniform(-1.063, 1, (len(POP_TIMES), 2))
    for (s, peak_db, hz, length_ms), knock, ratios in zip(POP_TIMES, knocks, detuned):
        u = t / (max(length_ms, 1) * rise_share / 1000) + 0.33   # time in swells; it sets in abruptly
        envelope = u * np.exp((1 - u ** stop) / stop)
        partials = np.sin(2 * np.pi * hz * ratios[:, None] * t).sum(axis=0)
        tone = envelope * (np.sin(2 * np.pi * hz * t) + amp(partial_db) * partials)
        band = bandpass(1, hz / below, hz * above)
        knock = peak_one(signal.sosfilt(band, signal.sosfilt(band, knock)))
        pop = tone + amp(knock_db - knock_loss_db_per_ms * length_ms) * knock
        at = round(s * SR)
        out[at:at + len(t)] += amp(peak_db) * peak_one(pop)
    return out[:N]


def scene():
    """Superposition: small cups radiate no deep bass; they sound in the room over the background."""
    between = handling() + scuffs() + fallen_cup_roll()
    contacts = fallen_cup_bounces() + stack_set_downs() + table_thumps() + clacks() + pops()
    no_bass = signal.butter(4, 140, "high", fs=SR, output="sos")
    return room(signal.sosfilt(no_bass, between + contacts)) + background()


# balance of the two channels: (frequency [Hz], left against right [dB])
CHANNEL_BALANCE = [(30, 6.5), (60, -2.5), (240, 0.5), (940, -.5), (3720, -2.5), (14700, -1)]


def record(dry):
    """Frequency response: the left leads in the deep bass, the right slightly in most else; the top is cut."""
    half = np.array(CHANNEL_BALANCE) * [1, .5]   # each channel takes half the difference
    leaned = np.array([coloured(dry[0], half), coloured(dry[1], half * [1, -1])])
    top_cut = signal.cheby2(14, 60, 14900, fs=SR, output="sos")   # 60 dB down from 14900 Hz
    return signal.sosfilt(top_cut, leaned)


dry = scene()
out = record(dry)
master(out)
```